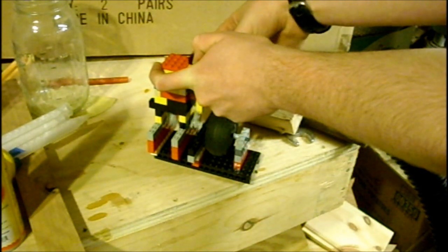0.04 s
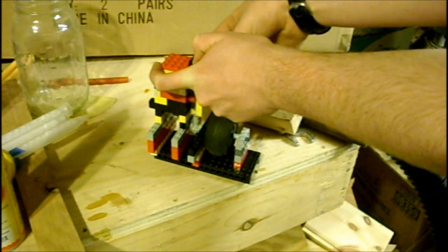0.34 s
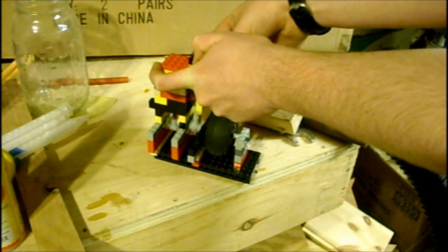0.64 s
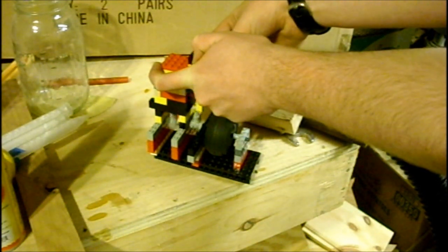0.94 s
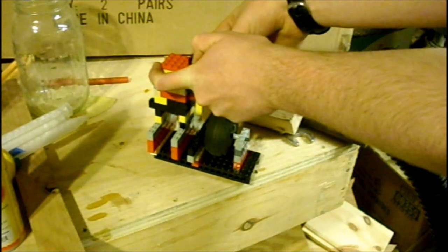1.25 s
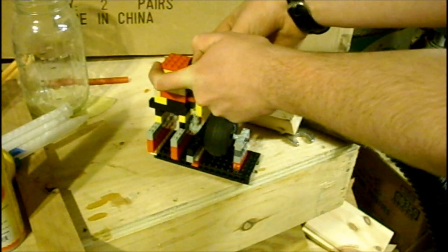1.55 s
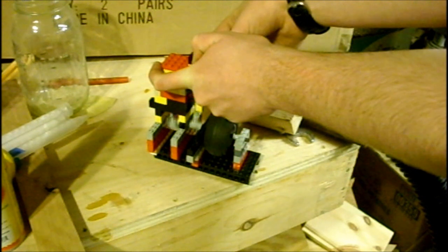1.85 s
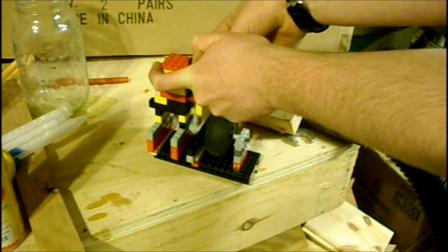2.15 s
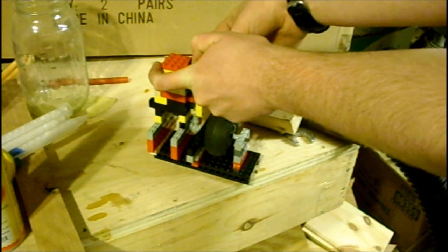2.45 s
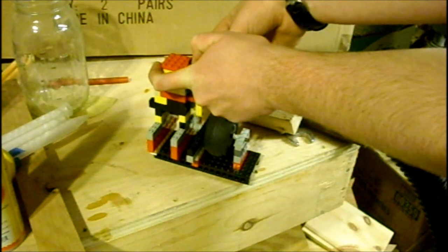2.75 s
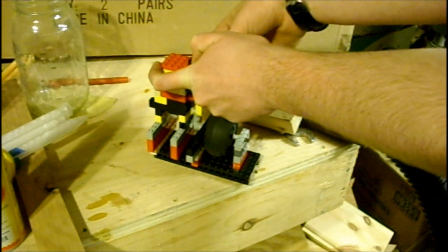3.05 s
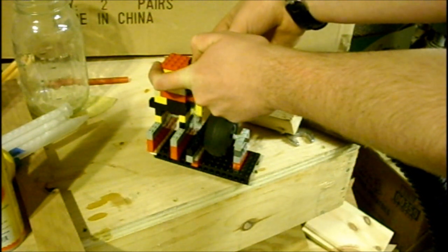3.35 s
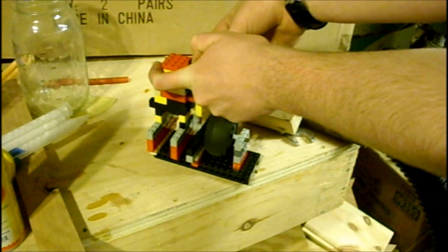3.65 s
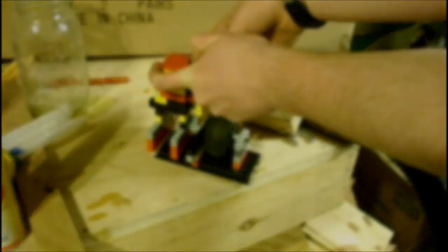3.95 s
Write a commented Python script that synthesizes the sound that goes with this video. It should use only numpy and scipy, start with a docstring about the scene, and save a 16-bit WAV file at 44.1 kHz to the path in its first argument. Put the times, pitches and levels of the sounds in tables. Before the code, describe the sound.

A vacuum cleaner is already running at constant speed in a small workshop. Rushing air roars under a steady motor hum and a high fan whine, heard nearby, then the whole sound gets somewhat quieter near the end.

```python
"""A vacuum cleaner is already running at steady speed in a small workshop.
From the start, air roars through the resonances of the housing, with a faint mains buzz underneath;
the motor's shaft hums and its fan whines at six times the shaft rate.
After 2.8 s the whole sound fades, ending 6.5 dB down."""
import sys
import numpy as np
from scipy import signal
from scipy.fft import rfft, irfft
from scipy.io import wavfile
from scipy.ndimage import uniform_filter1d

SR = 44100
rng = np.random.default_rng(int(sys.argv[2]) if len(sys.argv) > 2 else 0)


def dump(signal):
    """Clip the signal to [-1, 1] and save it as 16-bit WAV at the path in sys.argv[1]."""
    limited = np.clip(np.atleast_2d(signal).T, -1, 1)
    pcm = np.round(limited * 32767).astype(np.int16)
    wavfile.write(sys.argv[1], SR, pcm)


N = 176400


def amp(db):
    """Decibels to gain."""
    return 10 ** (np.asarray(db) / 20)


def unit_rms(x):
    """Normalises to rms 1."""
    return x / np.sqrt(np.mean(abs(x) ** 2) + 1e-20)


def automation(points):
    """Straight ramps between (time, value) breakpoints."""
    return np.interp(np.arange(N) / SR, *np.transpose(points))


def drift(rate_hz):
    """A slow random modulator of rms 1, rolled off above the given rate."""
    hz = np.fft.rfftfreq(N, 1 / SR)
    spectrum = rfft(rng.standard_normal(N)) * (hz > .6) / (1 + (hz / rate_hz) ** 4)
    return unit_rms(irfft(spectrum, N))


def workshop_response(hz, wet_db=-13, predelay_s=.008, t60_s=.15, low_cut_hz=1100):
    """Frequency response of the direct sound plus a short scatter of treble from walls and bench."""
    t = np.arange(N) / SR
    tail = rng.standard_normal(N) * (t > predelay_s) * amp(-60 * t / t60_s)
    low_cut = 1 / np.sqrt(1 + (low_cut_hz / (hz + 1)) ** 4)
    return 1 + amp(wet_db) * low_cut * rfft(tail / np.linalg.norm(tail))


def turbulence(depth_db=.5, eddy_hz=400, eddy_s=.04):
    """White noise textured by brief eddies, scattered over time and frequency."""
    size, hop = 512, 128
    noise = signal.stft(rng.standard_normal(N), nperseg=size, noverlap=size - hop)[2]
    bins, frames = round(eddy_hz * size / SR), round(eddy_s * SR / hop)
    eddies = uniform_filter1d(rng.standard_normal(noise.shape), bins, axis=0)
    eddies = unit_rms(uniform_filter1d(eddies, frames, axis=1))
    return signal.istft(noise * amp(depth_db * eddies), nperseg=size, noverlap=size - hop)[1][:N]


# Broad EQ curve of the rushing air: f/Hz, relative level/dB
AIR_EQ = [(20, -33.5), (80, -30), (140, -20.5), (200, -19), (310, -18), (375, -2), (405, -2.5), (428, -7.5),
          (460, 0.5), (580, -2.5), (630, -9.5), (745, -10.5), (790, -1.5), (830, -4.5), (905, -0.5),
          (1000, -4.5), (1075, -9.5), (1150, -10.5), (1210, -15.5), (1300, -17.5), (1470, -20.5),
          (1750, -14.5), (1900, -14.5), (2110, -13), (2240, -4), (2330, -10.5), (2700, -9), (2950, -14.5),
          (3080, -21), (3450, -18), (3620, -21), (3950, -18), (4150, -22), (4450, -23), (4550, -29),
          (5050, -27.5), (5350, -24.5), (5600, -18.5), (5850, -21.5), (6130, -27), (6450, -27), (6700, -36),
          (6950, -44.5), (7150, -55.5), (7300, -83.5)]
# Narrow resonances of the housing and hose: f/Hz, width/Hz, boost/dB
HOUSING_RESONANCES = [(227, 22, 5.5), (276, 20, 11.5), (463, 25, 1), (709, 25, 3.5), (923, 40, 1.5),
                      (1105, 22, 2.5), (1620, 25, 3.5), (2386, 25, 3.5), (2566, 40, 2.5), (2800, 30, 1),
                      (2948, 30, 3.5), (3152, 28, 9.5), (3280, 35, 4.5), (3520, 30, 1.5), (3750, 27, 6.5),
                      (4000, 40, 0)]


def air_roar(level_db=-15.5, surge_db=.24, surge_hz=12):
    """The noise bed: turbulent air, coloured by the housing and rippled by the room's reflections."""
    hz = np.fft.rfftfreq(N, 1 / SR)
    eq_hz, eq_db = np.transpose(AIR_EQ)
    broad_db = np.interp(np.log(hz + 1), np.log(eq_hz), eq_db)
    peaks_db = sum(boost / (1 + (2 * (hz - f) / width) ** 2) for f, width, boost in HOUSING_RESONANCES)
    stream = turbulence() * amp(surge_db * drift(surge_hz))
    spectrum = rfft(stream) * amp(broad_db + peaks_db) * workshop_response(hz)
    return amp(level_db) * unit_rms(irfft(spectrum, N))


def fluttering_tone(cycles, level_db, flutter, flutter_hz=14):
    """A sine whose level and phase are shaken by the moving air."""
    shake = 1 + flutter * (drift(flutter_hz) + 1j * drift(flutter_hz)) / np.sqrt(2)
    carrier = np.exp(2j * np.pi * (cycles + rng.random()))
    return amp(level_db) * np.sqrt(2) * (shake * carrier).real


def mains_hum(hum_hz=119.9):
    """The motor's magnetic hum, tucked low in the mix."""
    return fluttering_tone(hum_hz * np.arange(N) / SR, level_db=-37, flutter=.1)


# Rotation rate of the shaft: t/s, f/Hz
SHAFT_SPEED = [(0, 346.0), (.8, 345.95), (2.2, 346.25), (3.0, 346.1), (4, 346.15)]
# Partials of the shaft and fan: multiple of the shaft rate, level/dB, flutter depth
SHAFT_PARTIALS = [(1, -15.5, 0.12), (2, -32.5, .4), (6, -24.5, 0.091), (12, -45, .25), (14, -52, .3)]


def shaft_and_fan(wander_hz=.087, wander_rate_hz=14):
    """Harmonics locked to the spinning shaft: the first is its hum, the sixth the fan's whine."""
    speed_hz = automation(SHAFT_SPEED) + wander_hz * drift(wander_rate_hz)
    turns = np.cumsum(speed_hz) / SR
    return sum(fluttering_tone(multiple * turns, db, flutter) for multiple, db, flutter in SHAFT_PARTIALS)


def scene():
    """Mono mix of the motor's tones and the roar of the air."""
    return (shaft_and_fan() + mains_hum() + air_roar())[None]


# Master fader, nearly flat until the closing fade: t/s, level/dB
MASTER_FADER = [(0, -0.03), (1.4, 0.35), (2.8, 0), (3.05, -1.5), (3.5, -3), (3.75, -5), (4, -6.5)]


def record(dry):
    """Rides the master fader, then cuts the top end steeply at 7350 Hz."""
    faded = dry * amp(automation(MASTER_FADER))
    high_cut = signal.firwin(801, 7350, window=("kaiser", 9), fs=SR)
    return signal.oaconvolve(faded, high_cut[None], "same")


dry = scene()
out = record(dry)
dump(out)
```